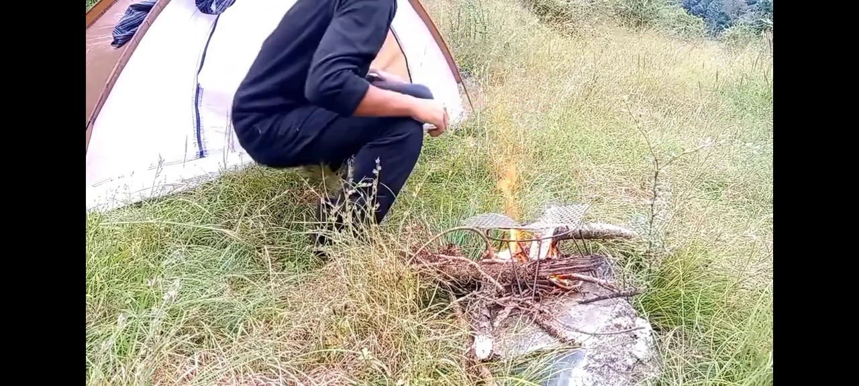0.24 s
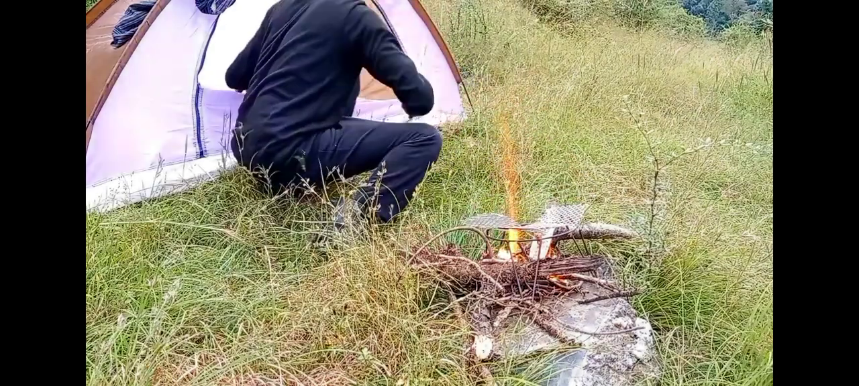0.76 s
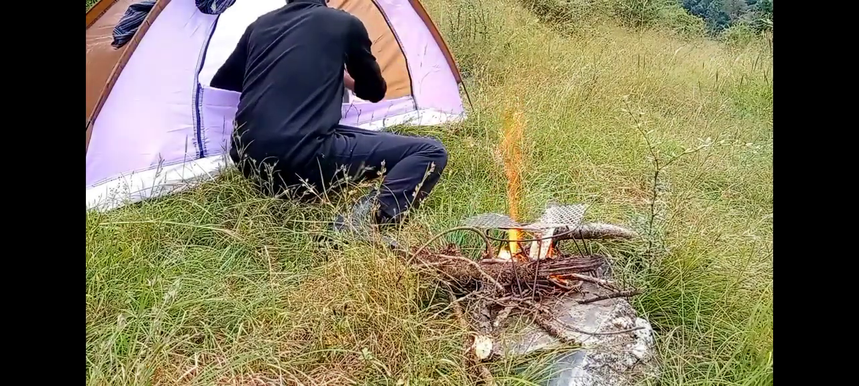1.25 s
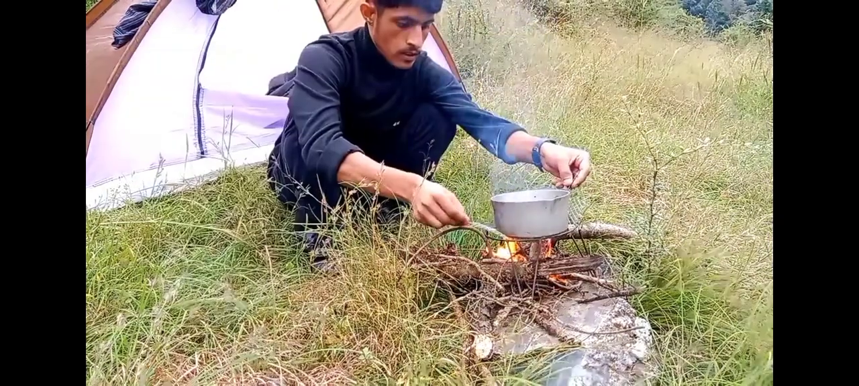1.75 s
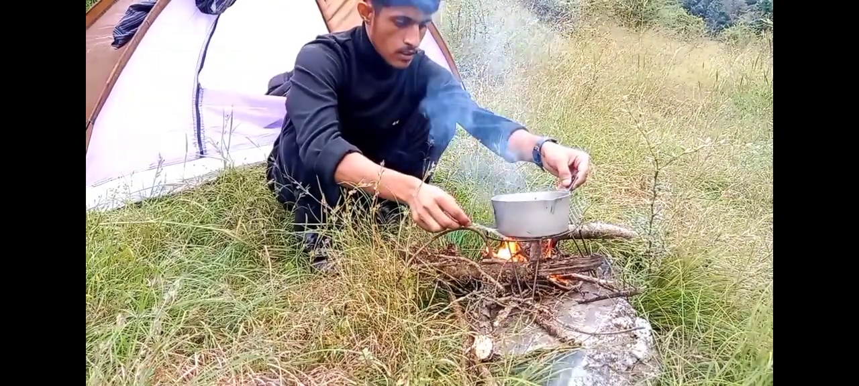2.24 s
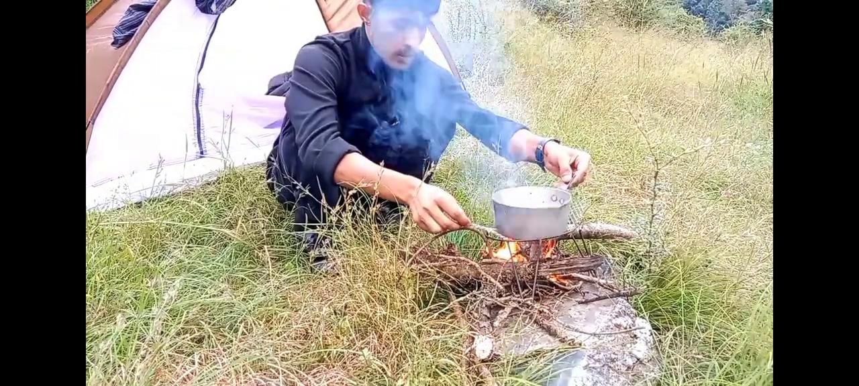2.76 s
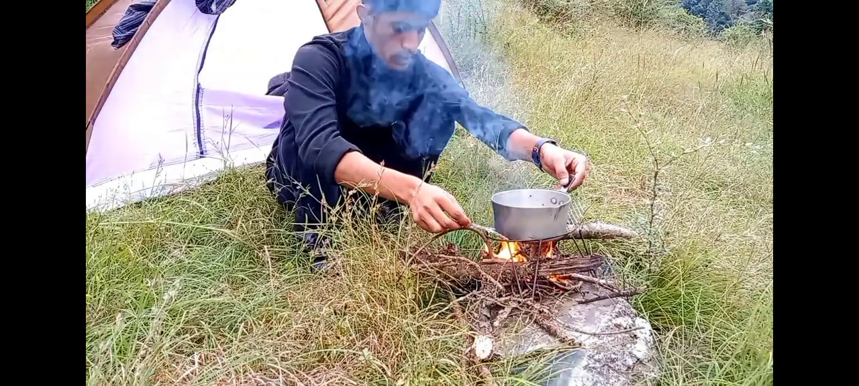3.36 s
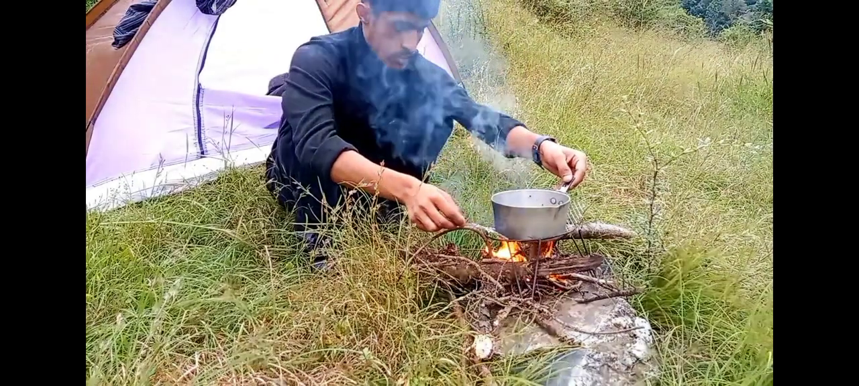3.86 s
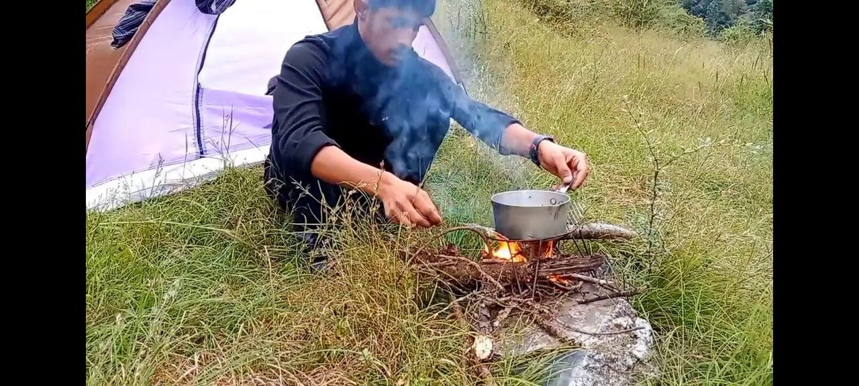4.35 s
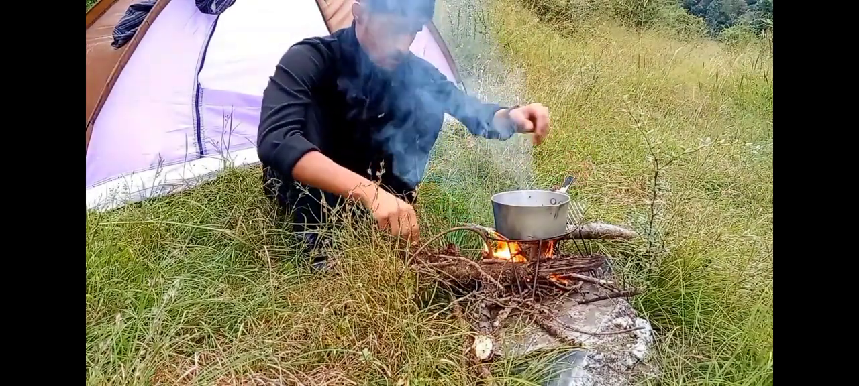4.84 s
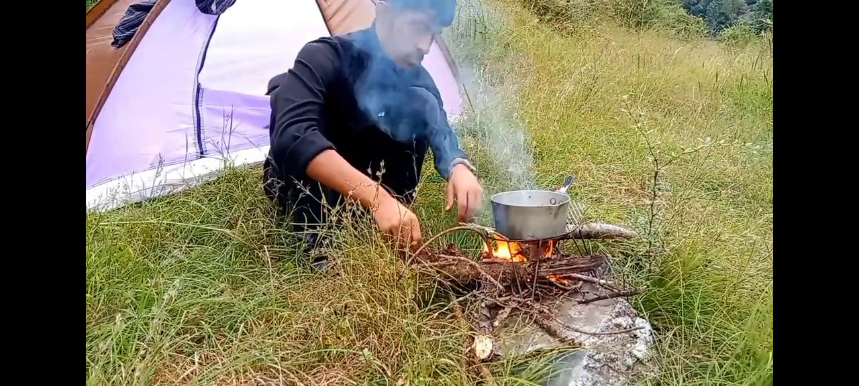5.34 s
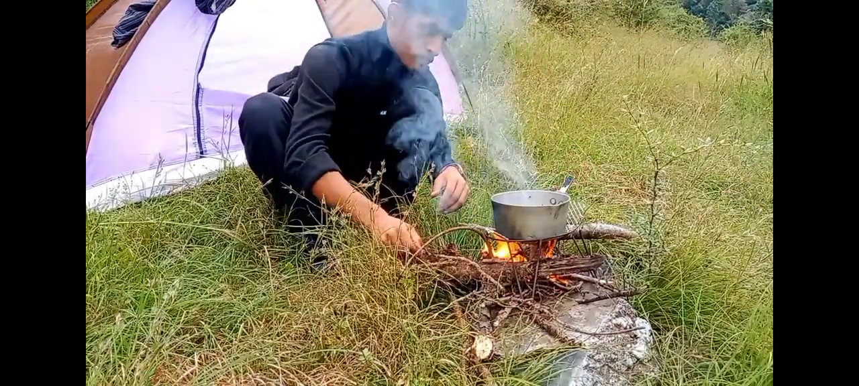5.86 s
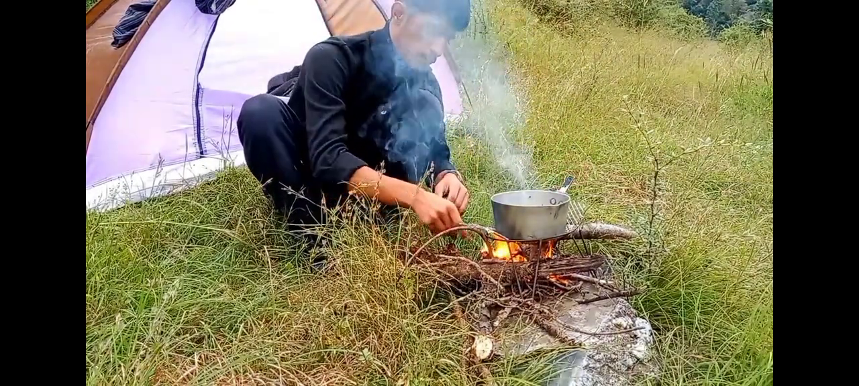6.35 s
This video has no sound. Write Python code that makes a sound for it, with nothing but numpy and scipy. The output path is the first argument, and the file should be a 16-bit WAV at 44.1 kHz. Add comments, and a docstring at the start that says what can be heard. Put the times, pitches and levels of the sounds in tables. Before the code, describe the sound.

In an open hillside meadow, two nearby cicadas hold a loud, rasping high buzz from the start. One stops before two seconds, the other just after three. Dry twigs snap throughout, thickest before the second stop, with a light pot clink and dull thump. Afterwards it is quiet: scattered woody pops, a faint flame and distant insects. One close microphone, the same in both channels, no room echo.

```python
"""Two close cicadas buzz from the first moment; one buzz falls away at about 1.7 s and the other at about 3.2
s, where the whole background drops too, while twigs snap in a small fire. The buzz is rows of filtered clicks
with rasping noise; each snap is a burst of noise ringing wood resonances. Faint whistles are gliding tones, a
pot clinks and thumps as decaying sines, and turf thuds are low noise bumps. Cloth and grass rustle as grainy
hiss. Behind them lie a fluttering flame and a far insect chorus, both shaped noise. It is a hillside meadow
heard by a single microphone."""
import sys
import numpy as np
from scipy import signal
from scipy.fft import rfft, irfft
from scipy.io import wavfile
from scipy.ndimage import uniform_filter1d

SR = 44100
rng = np.random.default_rng(int(sys.argv[2]) if len(sys.argv) > 2 else 0)


def to_wav(s):
    """Save 16-bit WAV."""
    ch = np.atleast_2d(s).T  # columns
    pcm = np.round(np.clip(ch, -1, 1) * 32767)  # PCM
    wavfile.write(sys.argv[1], SR, pcm.astype(np.int16))


N = 291060  # length in samples, 6.6 s


def undb(db):
    """Turns decibels into a gain."""
    return 10 ** (np.asarray(db) / 20)


def unit(x):
    """Scales a sound to an rms of 1."""
    return x / np.sqrt(np.mean(x ** 2))


def decay(t, t60_s):
    """A fading sound: it drops 60 dB in t60_s seconds."""
    return np.exp(-np.log(1000) * t / t60_s)


def level_curve(rows):
    """Joins (time_s, level_db) points with straight lines, giving a level for every sample."""
    time_s, level_db = np.transpose(rows)
    return np.interp(np.arange(N) / SR, time_s, level_db)


def colour(x, points):
    """Filters x through (pitch_hz, gain_db) points; folding the cepstrum makes the filter causal."""
    hz, db = np.transpose(points)
    log_hz = np.log(np.maximum(np.arange(2049) * SR / 4096, 1))
    log_gain = np.interp(log_hz, np.log(hz), db) * np.log(10) / 20
    cepstrum = irfft(log_gain)
    cepstrum[1:2048] *= 2
    cepstrum[2049:] = 0
    response = irfft(np.exp(rfft(cepstrum)))
    return signal.fftconvolve(x, response)[:len(x)]


def band(x, hz, width_hz):
    """One resonance, with a gain of 1 at its centre."""
    return signal.lfilter(*signal.iirpeak(hz, hz / width_hz, SR), x)


def steep(x, hz, width_hz):
    """The same resonance applied twice, for steeper sides."""
    return band(band(x, hz, width_hz), hz, width_hz)


def walk(rate, size=N):
    """A smooth random wander: random values held for 1 / rate seconds, then averaged twice."""
    hold = int(SR / rate)
    steps = np.repeat(rng.standard_normal(size // hold + 1), hold)
    return uniform_filter1d(uniform_filter1d(steps, hold), hold)[:size]


def add(out, start_s, x):
    """Mixes x into out from start_s on."""
    i = int(start_s * SR)
    out[i:i + len(x)] += x[:N - i]


# Tone of the click-making plates (tymbals), one list per cicada: pitch_hz, gain_db
TYMBAL_TONES = [
    [(3500, -76.5), (4500, -44), (5100, -27), (5650, -20.5), (5800, -0.5), (6100, -4.5), (6400, 3.5),
     (6850, 0.5), (7500, -5.5), (8500, -16.5), (9400, -38.5), (10500, -35), (10800, -61.5)],
    [(3500, -70.5), (4500, -49), (5200, -30.5), (5900, -18.5), (6250, -1), (6750, 1.5), (7500, -7.5),
     (8700, -14.5), (9400, -27), (10500, -30), (10800, -61.5)],
]
# Loudness of the buzz over time, one list per cicada: time_s, level_db
BUZZ_LEVELS = [
    [(0, -22.5), (1.2, -22), (1.6, -22.5), (1.72, -29.5), (1.8, -57), (1.85, -130)],
    [(0, -26), (1.3, -26), (1.6, -21.5), (1.9, -21), (2.3, -24), (2.7, -25), (3.1, -28), (3.19, -30),
     (3.215, -40), (3.26, -48.5), (3.32, -74), (3.4, -130)],
]
# Smooth treble hiss riding on the buzz: pitch_hz, gain_db
SHEEN_TONE = [(9000, -29.5), (10800, -6), (14000, -8), (15300, 4), (15900, -36.5)]
STEADY_CLICKS_PER_S = (473, 509)  # one rate per cicada
QUICKEN_FROM_S, QUICKEN_PER_S2 = 1.72, 48  # from this time, clicks per second gained each second
THROB_PER_S, THROB_DB = 37, 1
RIBS = 4  # clicks in one buckling of the tymbal


def cicada(steady_rate, levels, tymbal, sheen_db=-42.5):
    """Tymbal ribs click regularly one after another, each with a rasp of noise; leaves return scattered echoes."""
    scatter_db, rib_s, jitter_s = 1.5, 6e-5, 2.4e-5
    rasp, rasp_share, leaves_db = .4, .15, -8.  # rasp gain, its fade as a share of a click period, echo level
    now = np.arange(N) / SR
    rate = steady_rate + QUICKEN_PER_S2 * np.maximum(now - QUICKEN_FROM_S, 0)
    db = level_curve(levels) + THROB_DB * np.sin(2 * np.pi * THROB_PER_S * now)

    # a click falls wherever the running count passes a whole number
    turns = np.cumsum(rate) / SR
    at = np.flatnonzero(np.diff(np.floor(turns)))
    chance = rng.standard_normal((5000, 2))[:len(at)]
    size = undb(scatter_db * chance[:, 0])
    # each rib has its own small lead or lag, the same at every buckling, plus a little jitter
    rib_lag = rib_s * np.resize(rng.standard_normal(RIBS), len(at))
    lag = rib_lag + jitter_s * chance[:, 1]
    clicks = np.zeros(N)
    clicks[np.clip(at + np.round(lag * SR).astype(int), 0, N - 1)] = size

    latest_click = np.clip(turns.astype(int) - 1, 0, len(at) - 1)
    puff = np.exp(-(turns % 1) / rasp_share) * size[latest_click]
    drive = unit(clicks) + rasp * unit(puff * rng.standard_normal(N))

    t = np.arange(SR // 25) / SR
    leaves = rng.standard_normal(len(t)) * np.exp(-t / .012)
    echoes = unit(signal.fftconvolve(drive, leaves)[:N])
    drive = drive + undb(leaves_db) * echoes

    sheen_gain = undb(sheen_db + 1.4 * walk(25))
    sheen = sheen_gain * unit(colour(rng.standard_normal(N), SHEEN_TONE))
    return (unit(colour(drive, tymbal)) + sheen) * undb(db + 0.73 * walk(9.8))


# Snapping twigs: start_s, level_db, own_ring_hz, wood_tilt_db_per_octave, t60_s,
# thud_db, crack_db, spit_db (the last three are relative to level_db)
TWIG_SNAPS = [(0.081, -33, 3400, 10, 0.165, -29.0, -15.0, -21.0),
              (0.179, -13.5, 3520, -2.5, 0.098, -31, -7, -29),
              (0.282, -32, 1860, 2, 0.165, -16, -11.0, -25), (0.573, -33, 3140, 7, 0.12, -21, -11, -26.0),
              (0.612, -38.5, 2220.0, 6, 0.085, -17, -15, -24.0),
              (0.695, -28.5, 2050, 4.5, 0.11, -26.5, 3.5, -14),
              (1.131, -39.5, 1950, 3, 0.09, -24.0, -7.0, -21.0),
              (1.162, -38.5, 2650, 14, 0.11, -22, -13, -22.0), (1.353, -32, 1770, 6, 0.13, -25, -4.0, -5),
              (1.452, -36.5, 2610.0, 6, 0.165, -35, -12.0, -24.0),
              (1.664, -28.5, 2960, 5.5, 0.22, -29, -14.5, -23.5),
              (1.728, -19.5, 1210.0, 2.5, 0.11, -9, -5, -11), (1.902, -30, 1890, 1, 0.15, -22, -5, -28.5),
              (1.973, -26.5, 1350.0, 1, 0.15, -21, -1, -21),
              (2.073, -21.5, 4230, -3.5, 0.11, -23.5, -7, -29),
              (2.197, -33.5, 2200.0, 6.5, 0.079, -33, -15.0, -31.0),
              (2.326, -24, 1306, -16, 0.14, -11.5, -18, -0.5), (2.461, -32.5, 2750, 6, 0.061, -35, -4, -21),
              (2.609, -33.5, 3100, -1, 0.18, -21, -16, -20), (2.686, -28.5, 4300, 3, 0.17, -32, -3, -20),
              (2.743, -16.5, 3190, 9.0, 0.12, -25, -2, -20),
              (2.956, -15.5, 2700, 1.5, 0.085, -19.5, -7, -26),
              (3.066, -12, 3650, -1.5, 0.1, -8, -11, -40.5), (3.27, -18.5, 2410, -3, 0.1, -9.5, 11.5, 2),
              (3.384, -20, 3000, -0.3, 0.087, -15, 0, -13.5), (4.013, -34, 3480, -0.2, 0.11, -26, -5, -29),
              (4.495, -29.5, 3120, -4, 0.11, -42, 1, -6), (4.702, -26, 2650, -5.3, 0.082, -28.5, 3.5, -8),
              (4.929, -24.5, 3080, -2, 0.14, -36, -2.5, -9), (4.941, -25, 1450, -6, 0.15, -29, -3, -21),
              (5.461, -37.0, 1740.0, -0.5, 0.13, -33.0, -13, -15),
              (5.699, -23.5, 1032, 2.5, 0.17, -14, 1, -10.5),
              (5.74, -11.3, 3930, 6.0, 0.027, -19.5, 1, -10), (5.804, -24, 1123, 1.7, 0.12, -10, 1.5, -8),
              (6.024, -40, 3100, 2, 0.091, -27.0, -8, -17.0),
              (6.039, -41.1, 1300, 1.2, 0.141, -21.0, -1, -5.5),
              (6.283, -47, 2150, -1, 0.14, -31.0, 3.5, -14.0), (6.534, -39, 1530, 0.5, 0.15, -9, -3, -21)]
# Rings shared by all twigs, before tilt and scatter: pitch_hz, level_db
WOOD_RINGS = [(1200, -16), (1550, -14), (2150, -13), (2680, -14), (3200, -14.5), (4200, -20.5)]
TEAR_S = 0.0036  # fibres tear this long before the wood dies away
OWN_RING_DB, RING_SCATTER_DB = -9, 2.5
PURE_DB_PER_DB = 0.18  # quieter twigs have less broad ringing, so they sound purer


def snaps(splinter_db=4.0, q=9.05, broad_db=-2.0, stray_db=0., bright_tail_db=-35.5, bright_t60_share=0.49,
          tail_db=-21.0, tail_t60_s=0.14, rise_s=0.00098, break_db=-3.0, break_s=0.0016):
    """Fibres tear in a ragged burst that rings the wood; treble dies first, the ground returns a soft tail."""
    out, t = np.zeros(N), np.arange(SR // 7) / SR
    hzs, wood_db = np.transpose(WOOD_RINGS)
    for s, db, own_hz, tilt_db, t60, thud_db, crack_db, spit_db in TWIG_SNAPS:
        noise = rng.standard_normal((5, len(t)))
        # ragged loudness in 40-sample steps
        ragged = np.repeat(rng.uniform(-1.7, 1.7, len(t) // 40 + 1), 40)[:len(t)]
        splinters = undb(splinter_db * ragged)
        splinters[:60] = undb(splinter_db)  # the first fibres part cleanly

        fall = (1 - np.exp(-t / rise_s)) * decay(np.maximum(t - TEAR_S, 0), max(t60, .02))
        # an extra burst at the break, stronger in louder twigs
        fall *= 1 + undb(break_db + (db + 24) / 6.1) * np.exp(-t / break_s)
        tail = undb(tail_db) * decay(t, tail_t60_s)
        slow = splinters * (fall + tail)
        quick = splinters * fall ** (1 / bright_t60_share) + tail * undb(bright_tail_db - tail_db)

        scatter = RING_SCATTER_DB * rng.standard_normal(len(hzs))
        ring_db = wood_db + tilt_db * np.log2(hzs / own_hz) + scatter
        rings = [*zip(hzs, ring_db), (own_hz, OWN_RING_DB)]
        # every part is a (sound, level_db) pair
        parts = [(steep(noise[0] * slow, hz, hz / q), g) for hz, g in rings]
        broad_gain_db = broad_db + PURE_DB_PER_DB * (db + 18)
        parts += [(steep(noise[0] * slow, hz, hz / 2.7), g + broad_gain_db) for hz, g in rings[::2]]
        # three extra rings at random pitches roughen the woody tone
        strays = np.exp(rng.uniform(np.log(hzs[0] * .85), np.log(5200), 3))
        parts += [(steep(noise[4] * slow, hz, hz / q), np.interp(hz, hzs, ring_db) + stray_db)
                  for hz in strays]
        parts += [(steep(noise[1] * slow, 600, 590), thud_db),
                  (steep(noise[2] * quick, 5580, 2100), crack_db),
                  (steep(noise[3] * quick, 12800, 7000), spit_db)]
        # level each part by the strength of its first 1/70 s
        add(out, s, sum(undb(db + g) * x / (3 * np.std(x[:SR // 70])) for x, g in parts))
    return out


# Tiny bright sparks: start_s, level_db (gain on the filtered noise)
SPARKS = [(0.9194, -42), (1.0864, -37), (1.623, -40), (1.8188, -47), (3.3298, -41), (4.363, -52),
          (4.8794, -65)]


def ticks(hz=12500., width_hz=12000.0, t60_s=0.032):
    """Sparks too small to ring the wood give a brief spit of treble noise."""
    out, t = np.zeros(N), np.arange(SR // 10) / SR
    for s, db in SPARKS:
        spit = steep(rng.standard_normal(len(t)), hz, width_hz) * decay(t, t60_s)
        add(out, s, undb(db) * spit)
    return out


# Faint whistles, perhaps sap in the twig ends or far birds (a row that ends before it starts is silent):
# start_s, loudest_s, end_s, first_pitch_hz, last_pitch_hz, top_level_db
WHISTLE_GLIDES = [(0, 0.025, 0.066, 3184, 3243, -44), (.05, 0.092, 0.14, 3250, 3320, -46),
                  (.11, 0.149, .18, 3310, 3360, -45.5), (.2, 0.324, 0.37, 540, 407.5, -56.5),
                  (.5, 0.587, 0.62, 3180, 3260, -49.5), (0.855, 0.877, 0.9, 1540, 1540, -56.5),
                  (.9, 1.042, 1.04, 3120, 3200, -60), (1.4, 1.497, 1.75, 3220, 3120, -53),
                  (1.65, 1.72, 2.03, 3190, 3250, -51.5), (1.956, 2.002, 2.26, 3050, 3190, -54),
                  (2.172, 2.254, 2.36, 3150, 3320, -51.5), (2.377, 2.415, 2.7, 1363, 1330, -46.5),
                  (2.47, 2.477, 4.5, 3200, 3100, -53.5), (2.598, 2.737, 2.7, 3120, 3080, -47),
                  (2.79, 2.847, 2.88, 3070, 3290, -44.5), (2.87, 2.926, 2.96, 3200, 3270, -42),
                  (4.08, 4.11, 3.96, 2520, 2550, -72.5), (4.552, 4.643, 5.6, 1230, 1310, -67.5),
                  (4.82, 4.923, 5.2, 1555, 1515, -59), (5.05, 5.07, 5.8, 3110, 3140, -72.5),
                  (5.17, 5.244, 5.4, 1570, 1500, -67), (5.224, 5.27, 5.32, 2310, 2335, -73),
                  (5.49, 5.52, 6, 2785, 2785, -71), (5.54, 5.648, 5.75, 1515, 1423, -61),
                  (5.936, 6.016, 6.03, 1300, 1287, -67), (5.94, 5.995, 6.02, 3150, 3150, -74),
                  (6.101, 6.13, 6.2, 1300, 1280, -75.5), (6.21, 6.245, 6.27, 1303, 1280, -64),
                  (6.355, 6.373, 6.4, 1395, 1330, -55), (6.424, 6.495, 6.52, 1340, 1290, -73)]
SWELL_DB_PER_S, FADE_DB_PER_S = 132, 122
WOBBLE_SHARE, FLICKER_DB = .022, 4.5  # random tremble: share of the pitch, and of the level


def whistles():
    """Thin breathy tones glide, swell and fade; random trembling of pitch and level makes the breath."""
    out, wobble, flicker = np.zeros(N), walk(400), walk(120)
    for start, loudest, end, first_hz, last_hz, top_db in WHISTLE_GLIDES:
        span = np.arange(max(int(start * SR), 0), int(end * SR))
        t = span / SR
        glide_hz = np.interp(t, [start, end], [first_hz, last_hz])
        hz = glide_hz * (1 + WOBBLE_SHARE * wobble[span])
        db = top_db - np.maximum(SWELL_DB_PER_S * (loudest - t), FADE_DB_PER_S * (t - loudest))
        gate = np.clip(np.minimum(t - start, end - t) / 0.0066, 0, 1)  # soft ends
        tone = np.sqrt(2) * np.sin(2 * np.pi * np.cumsum(hz) / SR)
        out[span] += gate * tone * undb(db + FLICKER_DB * flicker[span])
    return out


# Ringing tones of the clinking pot: pitch_hz, level_db, t60_s
POT_TONES = [(700, -10, .15), (867, -6, .1), (1351, -14, .3), (2272, 0, .2), (3311, -6, .2),
             (4090, -15, .3), (4888, -3, .2)]
# When the pot clinks: start_s, level_db
POT_CLINKS = [(2.325, -27), (3.273, -46)]
# Ringing tones of the pot bottom: pitch_hz, level_db, t60_s
BOTTOM_TONES = [(186.6, 1.5, 0.31), (254, -1, 0.15), (395, -4, 0.19)]
# When the pot bottom thumps: start_s, level_db
POT_THUMPS = [(1.73, -44), (3.274, -32.5)]


def knocks(blows, modes, contact_s, rough_db):
    """Each blow rings the same tones, each wavering randomly in level as it fades; a soft contact swells slowly."""
    out, t = np.zeros(N), np.arange(SR // 2) / SR
    for s, db in blows:
        ring = 0
        for hz, g, t60 in modes:
            wavering = undb(g + rough_db * walk(45, size=len(t)))
            ring = ring + wavering * decay(t, t60) * np.sin(2 * np.pi * hz * t)
        add(out, s, undb(db) * ring * (1 - np.exp(-t / contact_s)))
    return out


# Knees and feet on turf: start_s, level_db, pitch_hz (centre of the noise), t60_s
TURF_THUDS = [(.2, -47.5, 506, 0.26), (.29, -51.5, 380, 0.29), (1.691, -44, 109, 0.3),
              (1.73, -56, 130, 0.14), (3.275, -43.5, 120, 0.36), (5.759, -49, 300, 0.36),
              (5.81, -48.5, 118, 0.26), (5.87, -55.5, 250, 0.12)]


def thuds(swell_s=0.01):
    """Dull, pitchless bumps through the turf, made of broad low noise that swells and dies."""
    out, t = np.zeros(N), np.arange(SR // 3) / SR
    for s, db, hz, t60 in TURF_THUDS:
        rumble = unit(steep(rng.standard_normal(len(t)), hz, hz))
        add(out, s, undb(db) * rumble * (1 - np.exp(-t / swell_s)) * decay(t, t60))
    return out


# Tone of brushed cloth and grass: pitch_hz, gain_db
CLOTH_TONE = [(300, -29.5), (1000, -6.5), (2500, -6), (4000, -5.5), (10000, -6), (14000, -12.5),
              (15400, -3), (16000, -41)]
# Quick brushing movements (a negative start is already under way): start_s, level_db
BRUSH_MOVES = [(-.09, -43), (.175, -44)]
BRUSH_RISE_S, BRUSH_HOLD_S, BRUSH_T60_S = 0.034, .03, 0.44


def rustle():
    """Cloth and grass brushed by quick movements make a grainy hiss that rises, holds and dies."""
    t = np.arange(N) / SR
    grains = rng.standard_normal(N) * undb(3.8 * walk(200))
    shape = np.zeros(N)
    for s, db in BRUSH_MOVES:
        rise = np.clip((t - s) / BRUSH_RISE_S, 0, 1) ** 2
        since_hold = np.maximum(t - s - BRUSH_RISE_S - BRUSH_HOLD_S, 0)
        shape += undb(db) * rise * decay(since_hold, BRUSH_T60_S)
    return unit(colour(grains, CLOTH_TONE)) * shape


# Tone of flame and breeze: pitch_hz, gain_db
FLAME_TONE = [(20, -55.5), (45, -24.5), (80, -7.5), (200, -9), (500, -14.5), (950, -13), (1390, -7),
              (2200, -19.5), (3110, -12), (3900, -22), (5000, -40.5), (7000, -49.5)]
# Loudness of flame and breeze over time: time_s, level_db
FLAME_LOUDNESS = [(0, -59.5), (1.87, -58.5), (2.7, -59.5), (3.29, -62.5), (3.51, -72), (4.4, -71),
                  (4.82, -68.5), (5.86, -73), (6.6, -72.5)]


def flame(flutter_db=5.0, gust_db=1.5):
    """Low roar and airy hiss share a gust; each half octave also flutters alone, faster towards the top."""
    hiss, gust, out = colour(rng.standard_normal(N), FLAME_TONE), walk(3.9), 0
    for hz in 40 * 2 ** np.arange(0, 7.5, .5):
        flutter = walk(4 + hz / 250)
        out = out + band(hiss, hz, hz / 4) * undb(gust_db * gust + flutter_db * flutter)
    return unit(out) * undb(level_curve(FLAME_LOUDNESS))


# Tone of the far insect chorus: pitch_hz, gain_db
CHORUS_TONE = [(3000, -60), (4200, -36), (5200, -15), (6100, -15), (6300, -8), (6450, 0), (6650, -6),
               (6850, -5), (7400, -27), (7750, -16), (8400, -29), (10500, -29), (10800, -39), (14500, -38),
               (15300, -33), (15900, -65)]
# Loudness of the chorus over time, before its wavering: time_s, level_db
CHORUS_LOUDNESS = [(3.3, -51.5), (3.5, -57.5), (4.3, -58), (4.9, -52), (5.2, -55), (5.68, -55.5),
                   (5.9, -61.5), (6.6, -59)]


def meadow():
    """Far insects blur into a wavering band of hiss."""
    hiss = unit(colour(rng.standard_normal(N), CHORUS_TONE))
    return hiss * undb(level_curve(CHORUS_LOUDNESS) + 2.5 * walk(12))


def scene():
    """All sources reach one microphone, copied to both channels."""
    cicadas = sum(cicada(*each) for each in zip(STEADY_CLICKS_PER_S, BUZZ_LEVELS, TYMBAL_TONES))
    fire = snaps() + ticks() + whistles() + flame()
    pot = knocks(POT_CLINKS, POT_TONES, 0.0024, 5.) + knocks(POT_THUMPS, BOTTOM_TONES, 0.0054, 5.1)
    return np.tile(cicadas + fire + pot + thuds() + rustle() + meadow(), (2, 1))


def record(dry):
    """A steep low-pass leaves nothing above about 16600 Hz."""
    low_pass = signal.ellip(10, .2, 70, 16600, fs=SR, output="sos")
    return signal.sosfilt(low_pass, dry)


dry = scene()
out = record(dry)
to_wav(out)
```